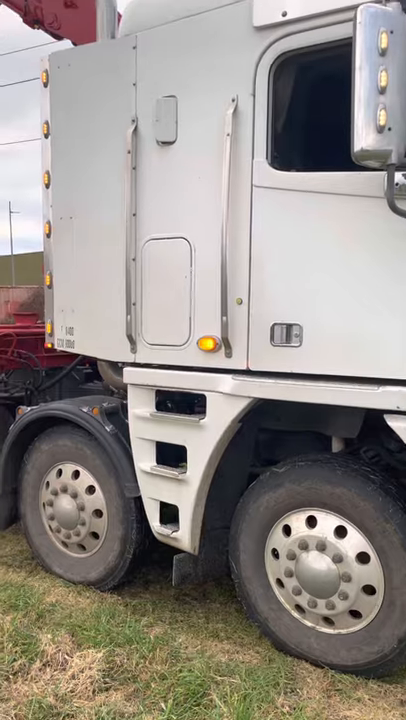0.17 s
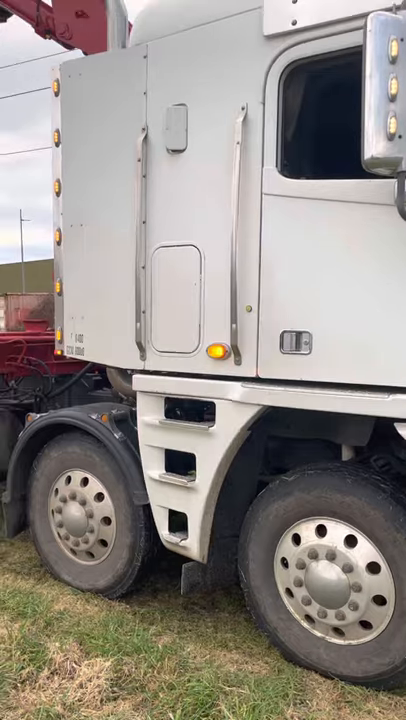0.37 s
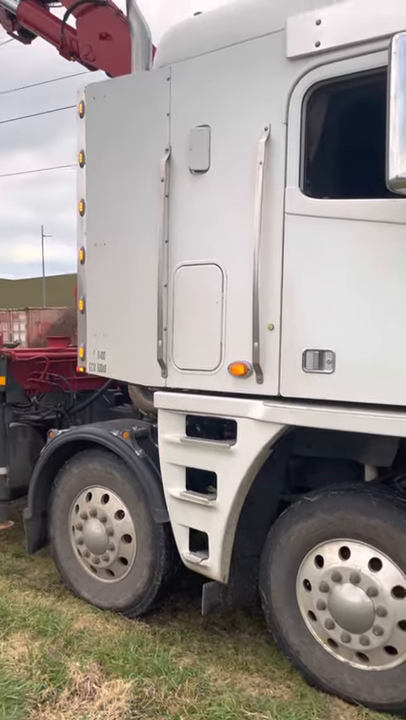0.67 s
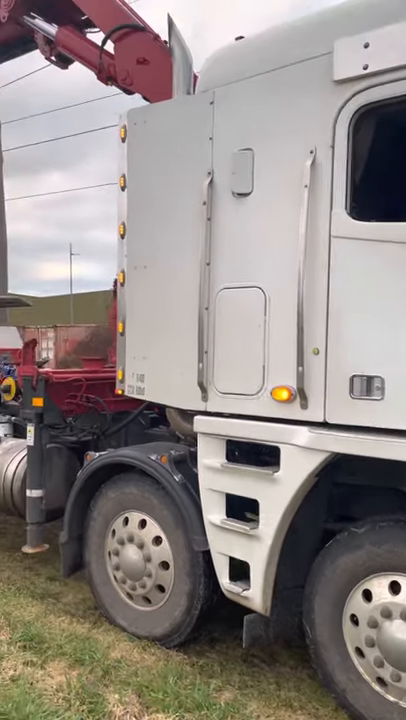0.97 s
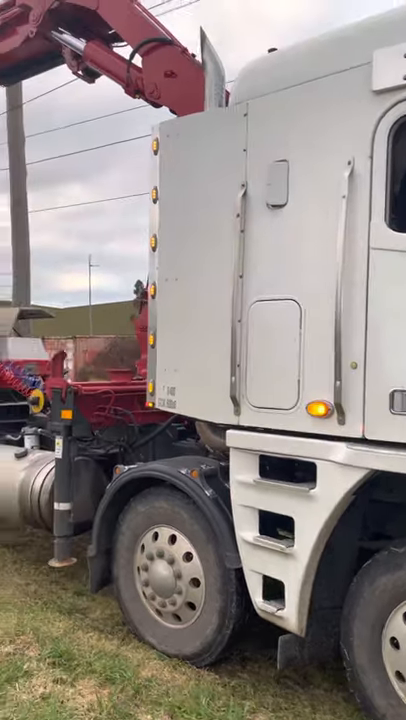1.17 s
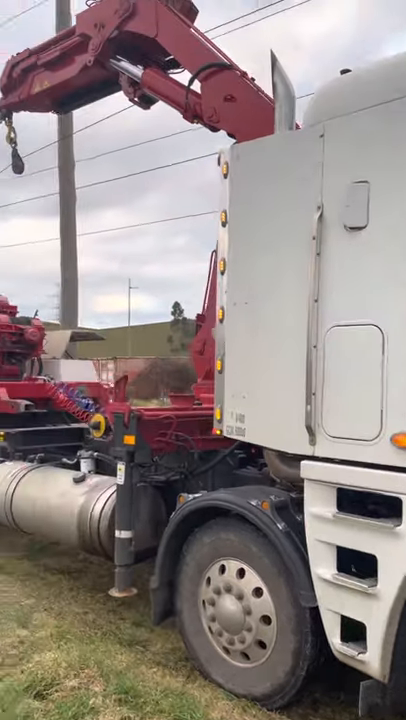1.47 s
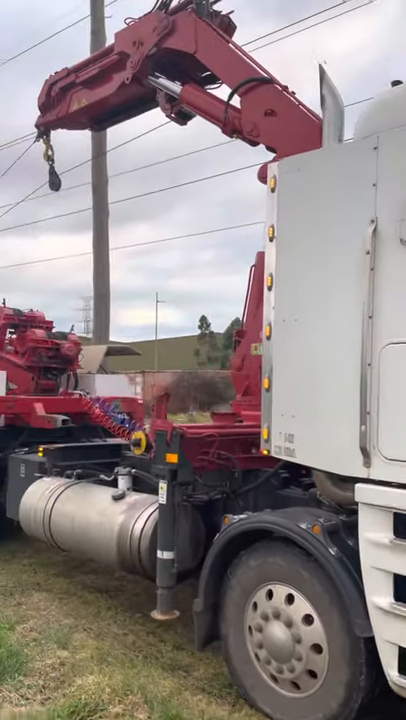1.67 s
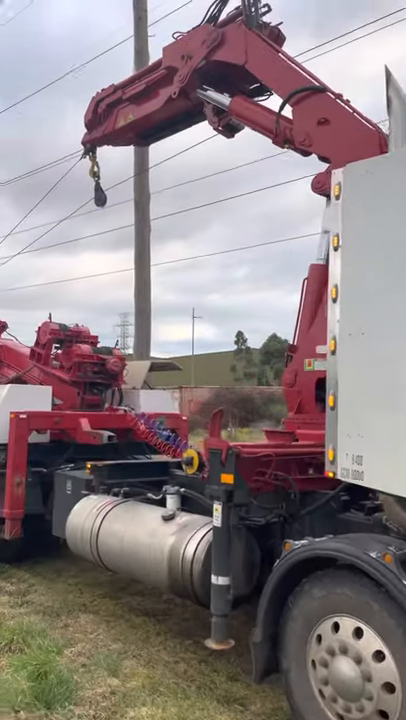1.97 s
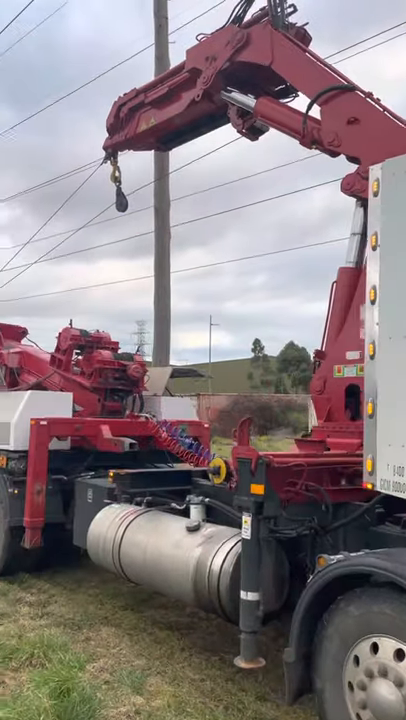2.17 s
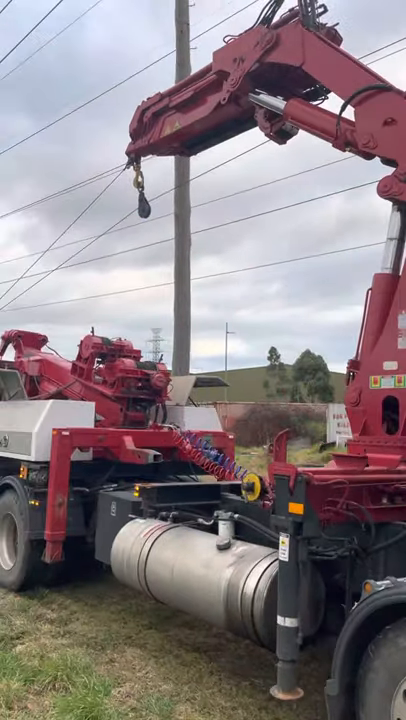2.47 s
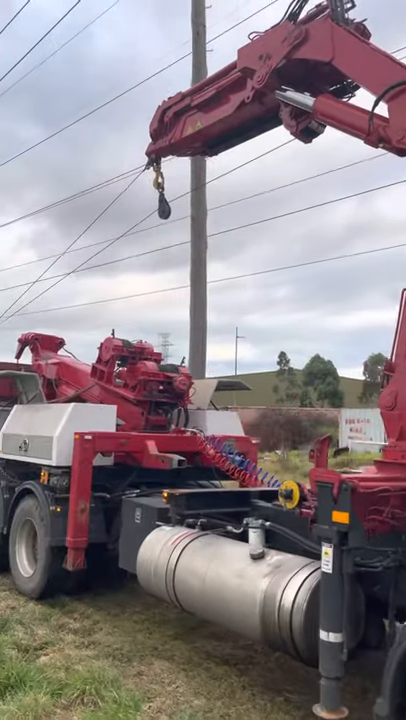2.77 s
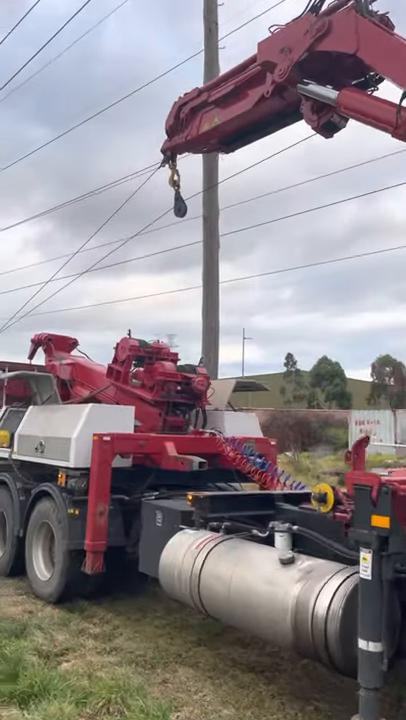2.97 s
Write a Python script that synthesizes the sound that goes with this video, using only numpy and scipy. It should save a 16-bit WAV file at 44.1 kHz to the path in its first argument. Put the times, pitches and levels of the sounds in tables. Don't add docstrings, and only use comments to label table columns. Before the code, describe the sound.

Close outdoor phone pickup of a heavy diesel idling: fast even exhaust beat, metallic engine knock and faint ticking, one short air release early, then scattered harder knocks and a dull clack at the end.

```python
import sys
import numpy as np
from scipy import signal
from scipy.fft import rfft, irfft, next_fast_len
from scipy.io import wavfile
from scipy.ndimage import uniform_filter1d

SR = 44100
rng = np.random.default_rng(int(sys.argv[2]) if len(sys.argv) > 2 else 0)


def attenuation_scalar(level_db):
    decades = np.asarray(level_db, float) / 20
    return 10 ** decades


def master_out(mix):
    frames = np.transpose(np.atleast_2d(mix))
    ceiling = np.clip(frames, -1, 1)
    pcm = np.round(ceiling * 32767).astype(np.int16)
    wavfile.write(sys.argv[1], SR, pcm)


N = 137151
T = np.arange(N) / SR
FIRING_HZ, FIRST_FIRING_S = 30.03, 0.010


def noise():
    return rng.standard_normal(N)


def level(x, db):
    return x * attenuation_scalar(db) / np.sqrt(np.mean(x ** 2))


def curve(table):
    hz, value = np.array(table).T
    return np.interp(np.log(np.fft.rfftfreq(N, 1 / SR) + 1), np.log(hz), value)


def colour(x, table):
    closed_below = [(table[0][0] / 2, -80)]
    closed_above = [(table[-1][0] * 1.0, -90)]
    return irfft(rfft(x) * attenuation_scalar(curve(closed_below + table + closed_above)), N)


def below(x, hz, order):
    ratio = np.fft.rfftfreq(N, 1 / SR) / hz
    return irfft(rfft(x) / np.sqrt(1 + ratio ** (2 * order)), N)


def walk(rate):
    k = int(SR / rate)
    steps = np.repeat(rng.standard_normal(N // k + 1), k)
    return 0.88 * uniform_filter1d(uniform_filter1d(steps, k), k)[:N]


def step(at_s, width_s):
    return 0.5 + 0.5 * np.tanh((T - at_s) / width_s)


def ring(x, table, turn=0):
    total = 0
    for hz, width, db, *face_db in table:
        wander = attenuation_scalar(db + sum(face_db) * turn + 0.84 * walk(4.4))
        struck = signal.lfilter(*signal.iirpeak(hz, hz / width, fs=SR), x)
        total = total + wander * struck / np.sqrt(width)
    return total


def bursts(pattern_db, scatter_db, rise, fall, floor):
    turns = (T - FIRST_FIRING_S) * FIRING_HZ + 1
    firing, phase = turns.astype(int), turns % 1
    count = firing[-1] + 1
    size = attenuation_scalar(np.resize(pattern_db, count) + scatter_db * rng.standard_normal(count))
    return floor + size[firing] * (1 - np.exp(-phase / rise)) * np.exp(-phase / fall)


# (time [s], cab panel pitch [Hz], panel level [dB], exhaust gas gain [dB], pump tone gain [dB])
PHONE_HEADING = [(.05, 810, -46, -1, -2), (.5, 820, -46, 0, -2), (.9, 840, -42, -2, 0),
                 (1.05, 860, -40, -3, 3), (1.2, 862, -39, -3, -7), (1.45, 862, -38.5, -3, -7),
                 (1.56, 825, -39, -1, -5), (1.9, 822, -38, 5, 1), (2.08, 830, -39, 7, 1),
                 (2.18, 865, -39, 7, 2), (2.5, 800, -41, 9, 2), (2.75, 810, -41, 8, 1),
                 (3.1, 840, -44, 5, -1)]


def heading(index):
    table = np.array(PHONE_HEADING)
    return np.interp(T, table[:, 0], table[:, index])


# (order [multiples of firing rate], level [dB], phase [rad], gain when facing the pipe [dB])
EXHAUST_ORDERS = [(1, -62, -0.08, 4.5), (2, -51, 0.36, 4), (3, -53.5, 0.44, -0.5), (4, -54.5, -1.6, 10.5),
                  (5, -59.5, 0.71, 10), (6, -64, 1, 6.5), (7, -64.5, -0.16, 15), (8, -60, 0.67, 3.5),
                  (9, -59.5, 0.65, 12.5), (10, -58, 0.96, 3)]
# (frequency [Hz], density [dB per Hz])
GAS_COLOUR = [(32, -12.5), (45, 0.5), (60, 3), (150, 0.5), (300, -3.5), (420, -5), (600, -8), (1000, -5)]


def exhaust(turn):
    tones = 0
    for order, db, phase, face_db in EXHAUST_ORDERS:
        size = np.sqrt(2) * attenuation_scalar(db + face_db * turn + 1.3 * walk(11.0))
        angle = 2 * np.pi * order * FIRING_HZ * T + phase + 0.059 * order * walk(7.11)
        tones = tones + size * np.cos(angle)
    pulses = bursts([0], 0.94, rise=0.1, fall=0.93, floor=0.051)
    gas = level(colour(noise() * pulses, GAS_COLOUR), -43.5)
    upper_band = signal.butter(2, [190, 560], "bandpass", fs=SR, output="sos")
    upper = signal.sosfilt(upper_band, gas)
    facing = attenuation_scalar(heading(index=3)) - 1
    return tones + attenuation_scalar(1.0 * walk(9.7)) * (gas + facing * upper)


CYLINDER_KNOCK = [-6.5, -5, -7.5, -5, -6.5, -5.5]
# (frequency [Hz], width [Hz], level [dB], gain when facing the rear [dB])
BLOCK_RING = [(643, 21, -8.5, 1.5), (701, 47, -3.5, 0), (717, 52, -5, 2.5), (817.4, 4.8, -8, -3.5),
              (833, 44, -10, -8), (934.5, 12, -18, -4), (969, 30, -13.5, -7.5), (1120, 49, -12, 14),
              (1270, 34, -25.5, -2.5), (1470, 23, -8, -18.5), (1700, 60, -35, -9), (1856, 120, -30, -13),
              (2100, 35, -49, -13)]
# (frequency [Hz], density [dB per Hz])
CLATTER_COLOUR = [(300, -20), (620, -10), (900, 0.5), (1150, -5), (1400, -17.5), (1650, -25.5),
                  (2200, -24.5), (3300, -71)]
# (frequency [Hz], density [dB per Hz])
FAN_COLOUR = [(3300, -7), (3700, 2), (4500, 3.5), (5500, 7), (6300, -4), (7500, -1.5), (9500, -23.5)]


def block(turn, early):
    beat = bursts(CYLINDER_KNOCK, 1.2, rise=0.054, fall=0.34, floor=0)
    ringing = level(ring(noise() * (beat + 0.27), BLOCK_RING, turn), -39)
    clatter = level(colour(noise() * (beat + 0.5), CLATTER_COLOUR), -38)
    hiss = level(colour(noise() * (beat + 0.19), FAN_COLOUR), -62.5)
    body = below(ringing + clatter, 3410, order=16)
    early_hiss_db = -3.5 * early
    return attenuation_scalar(-1.04 * turn + 0.2 * walk(5.74)) * body + attenuation_scalar(early_hiss_db) * hiss


# (frequency [Hz], level [dB])
GEAR_TONES = [(820, -50), (932, -58.5), (1483, -62)]


def wavering_tone(hz, db):
    size = np.sqrt(2) * attenuation_scalar(db + 1.4 * walk(11))
    return size * np.cos(2 * np.pi * hz * T + 2.14 * walk(9))


def whine():
    pump = wavering_tone(618, -48 + heading(index=4))
    return pump + sum(wavering_tone(hz, db) for hz, db in GEAR_TONES)


def panel():
    def push():
        shaking = bursts(CYLINDER_KNOCK, 1.6, rise=0.06, fall=0.94, floor=0.048)
        return below(noise() * shaking, 20, order=1)
    shaking = bursts(CYLINDER_KNOCK, 1.6, rise=0.06, fall=0.94, floor=0.048)
    push_a = below(noise() * shaking, 20, order=1)
    push_b = below(noise() * shaking, 20, order=1)
    phase = 2 * np.pi * np.cumsum(heading(index=1)) / SR
    tone = push_a * np.cos(phase) + push_b * np.sin(phase)
    return level(tone, 0) * attenuation_scalar(heading(index=2))


# (frequency [Hz], width [Hz], level [dB])
INJECTOR_METAL = [(1977, 72, -1.5), (2172, 120, -1.5), (2860, 370, -9.5)]


def injectors():
    rap = noise() * bursts(CYLINDER_KNOCK, 0.93, rise=0.018, fall=0.18, floor=0.079)
    return level(colour(ring(rap, INJECTOR_METAL), [(1750, 0.01), (3200, 0.01)]), -56.5)


TICK_STRENGTH = [-1, -8, -14, 0, -6, -14]
# (frequency [Hz], width [Hz], level [dB])
TICK_RING = [(2985, 40, -4), (3380, 55, 0)]


def tappets():
    tick = noise() * bursts(TICK_STRENGTH, 2.0, rise=0.037, fall=0.13, floor=0.039)
    return level(colour(ring(tick, TICK_RING), [(2700, 0.02), (3500, 0.0077)]), -63)


# (time [s], jet level [dB], throat level [dB])
AIR_FLOW = [
    (0.529, -26.5, -32.5),
    (0.562, -18, -18),
    (.63, -11, -9.5),
    (.69, 1, -5.5),
    (0.732, -3.5, -6),
    (.765, -9.5, -4),
    (.79, -12.5, -4.5),
    (0.82, -17, -6.5),
    (0.85, -36, -32.5),
]


def flow(index=1):
    table = np.array(AIR_FLOW)
    return attenuation_scalar(np.interp(T, table[:, 0], table[:, index], left=-90, right=-90))


# (frequency [Hz], density [dB per Hz])
PUFF_COLOUR = [(250, -31.5), (500, 11), (900, 3.5), (1500, -23), (2800, -10.5), (4500, -47), (6000, -21.5),
               (7000, -31.5)]
# (frequency [Hz], width [Hz], level [dB])
VALVE_RING = [(590, 97, -11), (852.6, 11, -1), (1302, 58, 4), (2510, 600, -15), (3900, 270, -14)]
# (time [s], level [dB], rise [s], fall [s])
AIR_SPITS = [
    (.5525, -45, .0005, .004),
    (.797, -38, .004, .012),
    (.872, -54, .002, .006),
]
# (frequency [Hz], density [dB per Hz])
SPIT_COLOUR = [(1200, -18), (2200, 2.5), (3500, 0.5), (4800, -1), (6500, -8.5), (8000, -3.5)]


def valve():
    rush = level(colour(noise(), PUFF_COLOUR), -28) + level(ring(noise(), VALVE_RING), -32.5)
    hum = below(rush, 740, order=4)
    jet = rush - hum
    flutter = attenuation_scalar(3.3 * walk(69.77))
    spits = 0
    for start, db, rise, fall in AIR_SPITS:
        since = np.maximum(T - start, 0)
        spits = spits + attenuation_scalar(db) * (1 - np.exp(-since / rise)) * np.exp(-since / fall)
    spit_air = level(colour(noise(), SPIT_COLOUR), 0)
    return flutter * (flow() * jet + flow(index=2) * hum) + spits * spit_air


# (time [s], level [dB], frequency [Hz], time to fade by 60 dB [s])
VALVE_CLACKS = [
    (0.5526, -12.5, 564, 0.014),
    (.5562, -12, 688, 0.0096),
    (3.039, -6.5, 490, 0.0099),
    (3.043, -44, 633, 0.017),
]


def clacks(table):
    out = np.zeros(N)
    for start, db, hz, t60 in table:
        since = np.maximum(T - start, 0)
        fade = np.exp(-np.log(1000) * since / t60)
        rise = (1 - np.exp(-since / 0.00055)) ** 2
        out += attenuation_scalar(db) * np.sin(2 * np.pi * hz * since) * fade * rise
    return out


# (time [s], peak level [dB], frequency [Hz])
HARD_FIRINGS = [(0.883, -28.5, 842), (1.083, -19.5, 869), (1.143, -32.5, 860), (1.193, -22, 829),
                (1.483, -29.5, 666), (1.513, -24.5, 920), (1.549, -30, 825), (1.677, -30, 817),
                (1.775, -30, 822), (1.811, -30, 856), (1.952, -24.5, 946), (1.973, -28, 725),
                (2.011, -21.5, 853), (2.062, -27.5, 618), (2.147, -28, 898), (2.208, -29.5, 641),
                (2.342, -26.5, 637), (2.677, -32.5, 608), (2.709, -40, 790), (2.744, -27.5, 653),
                (2.942, -27.5, 673), (2.967, -27, 920), (3.011, -22, 857)]


def hard_knocks():
    return clacks([(start, db - 3.5, hz, 0.06) for start, db, hz in HARD_FIRINGS])


# (frequency [Hz], left minus right [dB])
PORT_BALANCE = [(70, 1.5), (320, 8), (420, -7), (600, 3), (790, 5), (900, -10), (1100, 2), (2050, -10),
                (3000, -3), (4500, 0)]
# (frequency [Hz], left ahead of right [rad])
PORT_TIMING = [(30, .4), (300, 1.0), (450, 1.6), (860, 1.8), (940, 4.2), (1200, 3.2), (1700, 3.2),
               (2600, 2.3), (5000, 3.7), (7000, 3.14)]
# (frequency [Hz], share of unrelated echo [0-1])
PORT_SCATTER = [(200, 0.022), (350, 0.35), (480, 0.35), (1700, 0.062), (2100, 0.89), (4000, 0.34),
                (6300, 0.29), (7600, 0.029)]


def ports(x, extra_echo, lead):
    more_echo = extra_echo * curve([(5200, 0.92), (7000, 0.074)])
    share = np.clip(curve(PORT_SCATTER) + more_echo, 0, 1)
    length = SR // 20
    fade = np.exp(-np.arange(length) / (0.014 * SR))
    echo = rfft(rng.standard_normal((2, length)) * fade, N)
    sign = np.array([[1], [-1]])
    heard = rfft(x) * attenuation_scalar(sign * curve(PORT_BALANCE) / 2)
    lag = np.exp(0.5j * sign * lead * curve(PORT_TIMING))
    direct = irfft(heard * np.sqrt(1 - share) * lag, N)
    echoed = irfft(heard * np.sqrt(share) * echo / abs(echo), N)
    scattered = signal.hilbert(echoed, next_fast_len(N))[:, :N]
    drift = np.exp(2j * np.array([walk(3.983), walk(3.94)]))
    return direct + np.real(scattered * drift)


def scene():
    turn = step(2.1, 0.38)
    early = 1 - step(1.0, 0.1)
    engine = exhaust(turn) + block(turn, early) + whine() + panel() + injectors() + hard_knocks()
    heard = ports(engine, 0, lead=0.98) + ports(tappets(), 0, lead=0.72)
    return heard + ports(valve(), 0.68, lead=1) + ports(clacks(VALVE_CLACKS), 0.036, lead=1)


# (time [s], level [dB], half length [s])
WIND_GUSTS = [
    (0.104, 5, 0.021),
    (0.205, -1.5, 0.025),
    (0.282, 2.5, 0.018),
    (0.467, -1.5, 0.012),
    (0.572, -9, 0.0061),
    (0.644, 3, 0.013),
    (3.005, 10, 0.0067),
]


def gusty_bass(x):
    gust_db = sum(db * np.exp(-((T - start) / half) ** 2) for start, db, half in WIND_GUSTS)
    open_db = 12.5 * (1 - step(0.74, 0.06))
    return x + (attenuation_scalar(open_db + gust_db) - 1) * below(x, 116, order=2)


def widen(x):
    side = x - x.mean(axis=0)
    low, upper = below(side, 130, order=4), below(side, 380, order=4)

    def ramp(length_s):
        return np.clip((T - 0.14) / length_s, -0.5, 1) - 1
    return x + ramp(0.08) * low + ramp(0.9) * (upper - low)


# (frequency [Hz], density [dB per Hz])
HAZE_COLOUR = [(8800, -3), (10000, -1), (12300, -5.5)]


def haze():
    return level(colour(noise(), HAZE_COLOUR), 0) * (attenuation_scalar(-99) + attenuation_scalar(-86) * flow())


def band_limit(x):
    return signal.sosfilt(signal.butter(12, 16370, fs=SR, output="sos"), x)


OPENING_CLICK = [
    [-.055],
    [.0],
]


def record(dry):
    wet = widen(gusty_bass(dry))
    wet = signal.sosfilt(signal.butter(6, 6400, fs=SR, output="sos"), wet)
    wet = signal.sosfilt(signal.butter(3, 21.6, "highpass", fs=SR, output="sos"), wet)
    start_s = 0.0362
    click = np.array(OPENING_CLICK) * np.exp(-abs(T - start_s) / 0.0008)
    end_fade = np.clip((N / SR - T) / 0.004, 0, 1)
    return band_limit((wet + haze() + click) * (T > start_s) * end_fade)


dry = scene()
out = record(dry)
master_out(out)
```